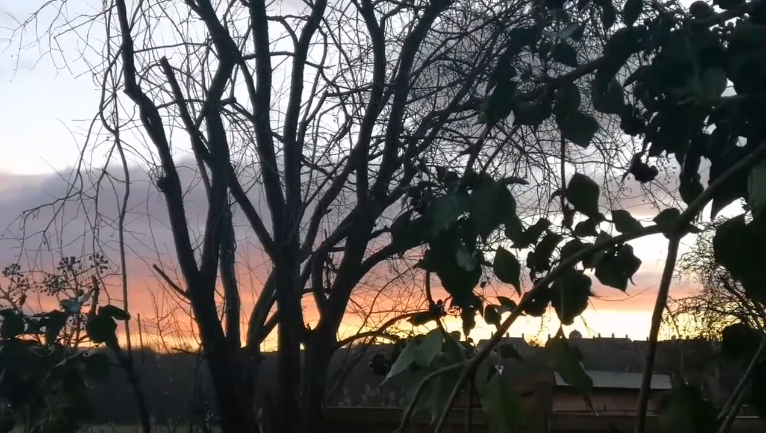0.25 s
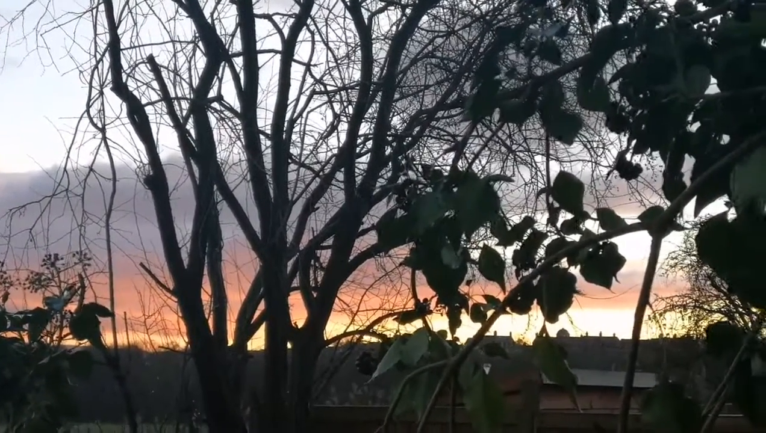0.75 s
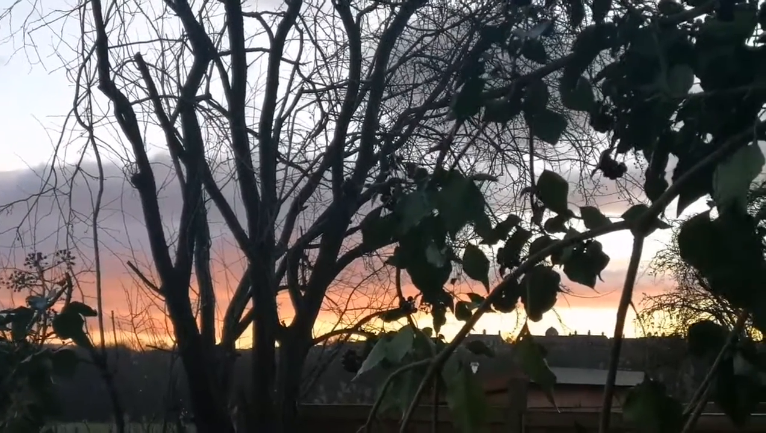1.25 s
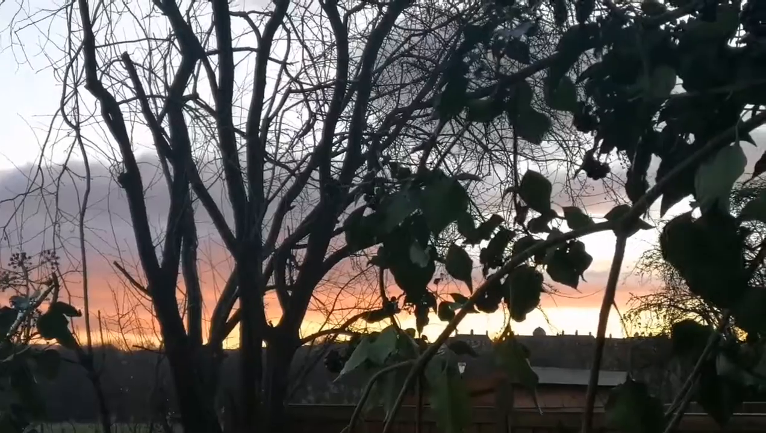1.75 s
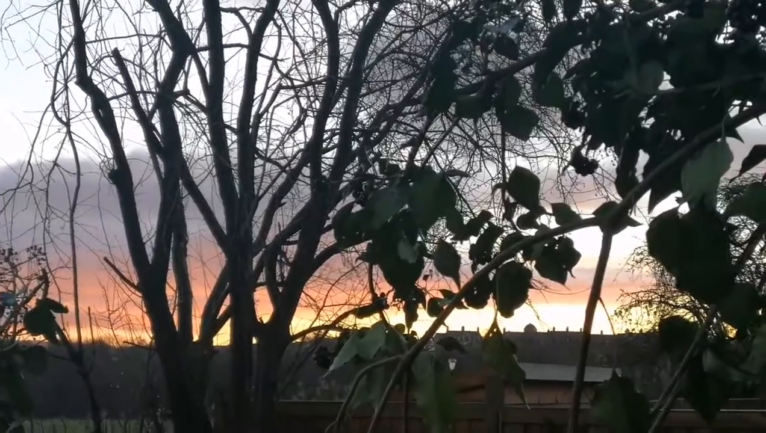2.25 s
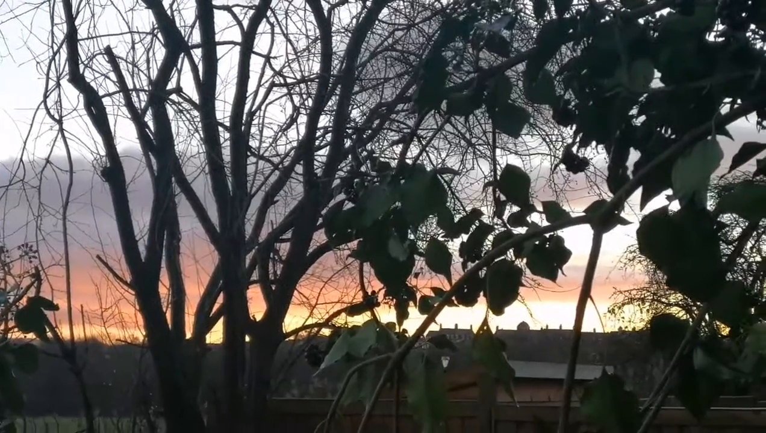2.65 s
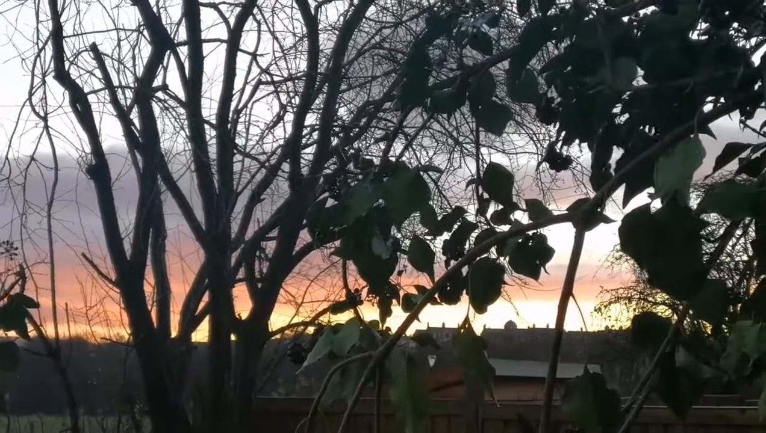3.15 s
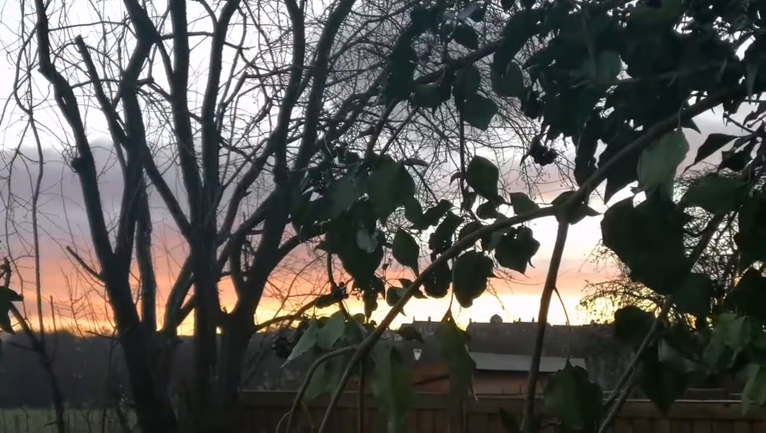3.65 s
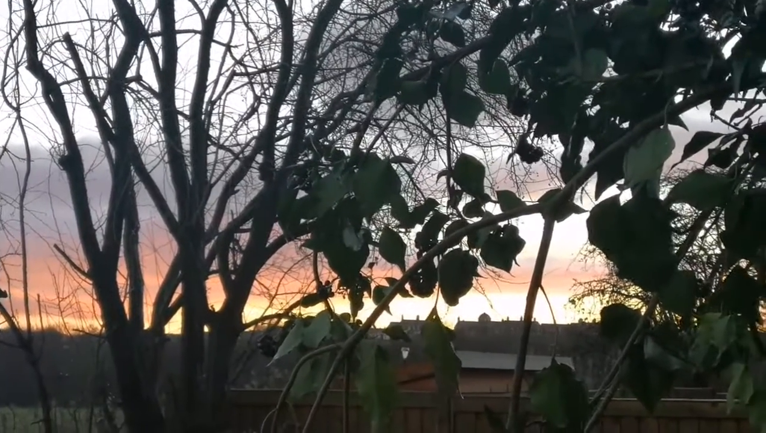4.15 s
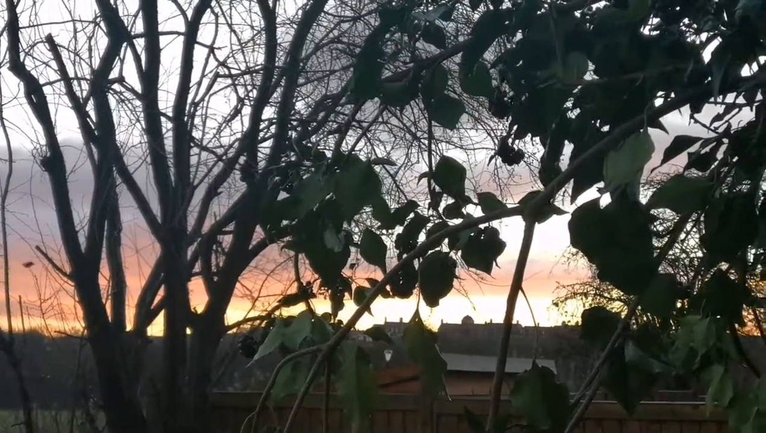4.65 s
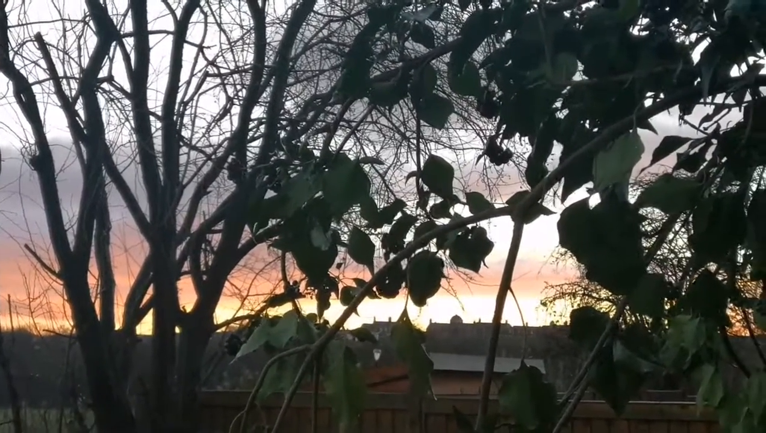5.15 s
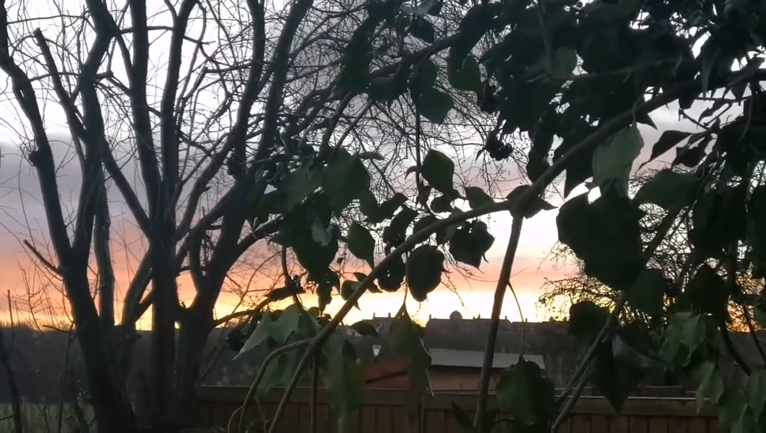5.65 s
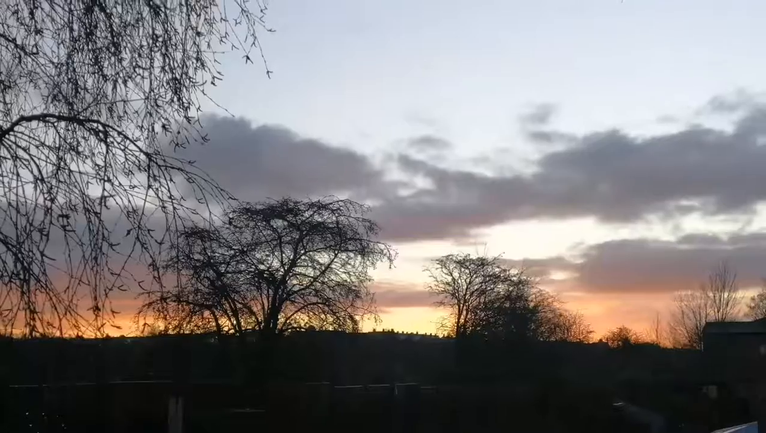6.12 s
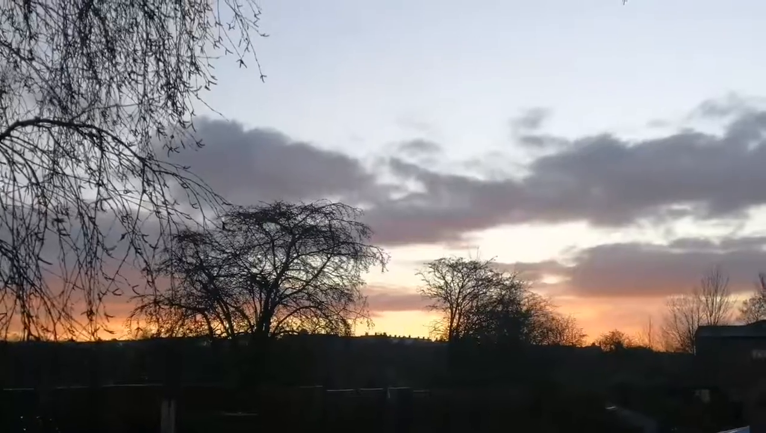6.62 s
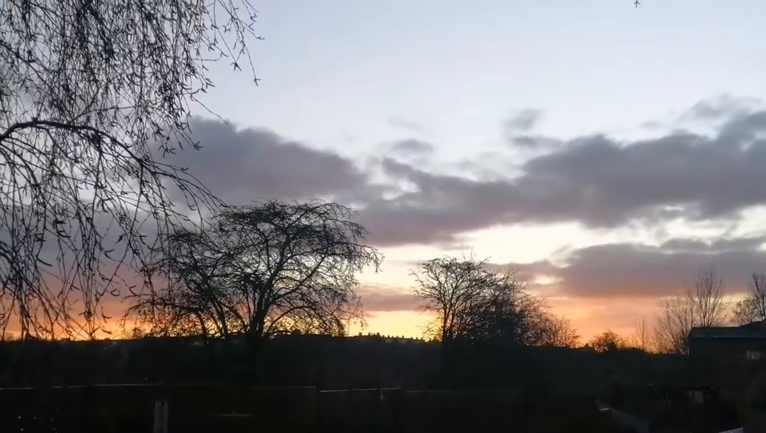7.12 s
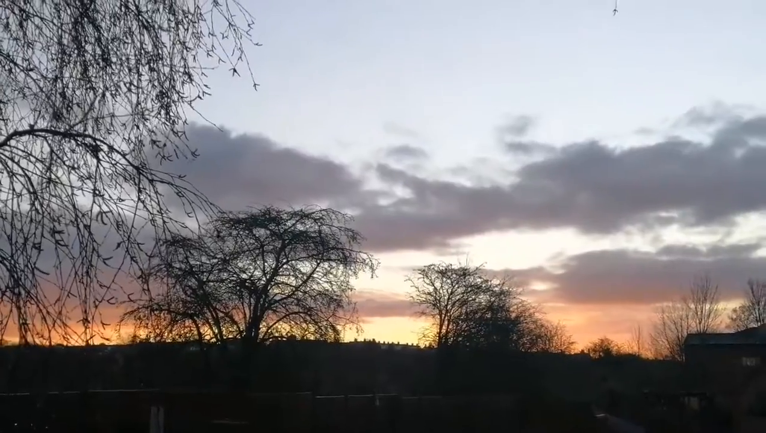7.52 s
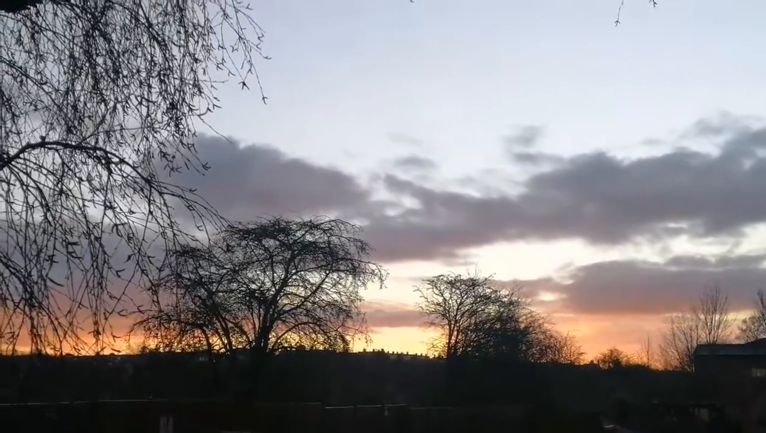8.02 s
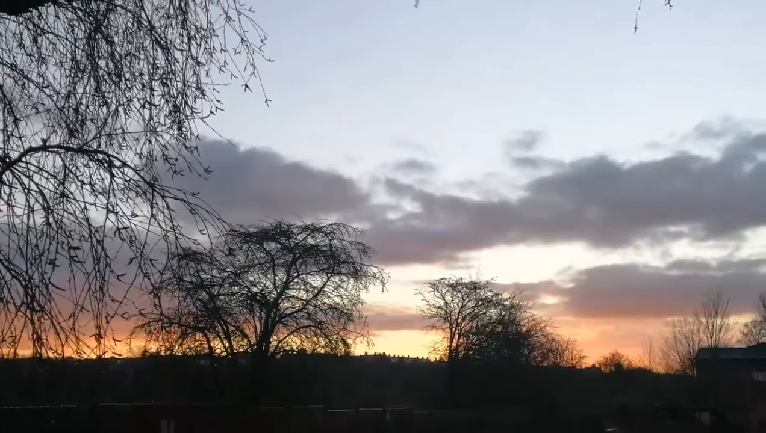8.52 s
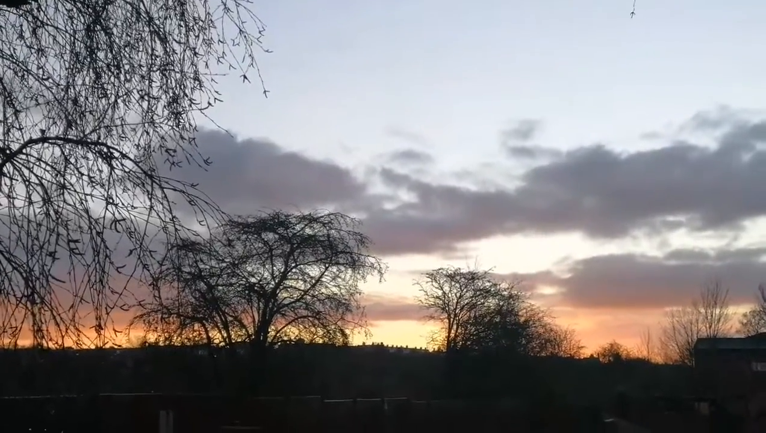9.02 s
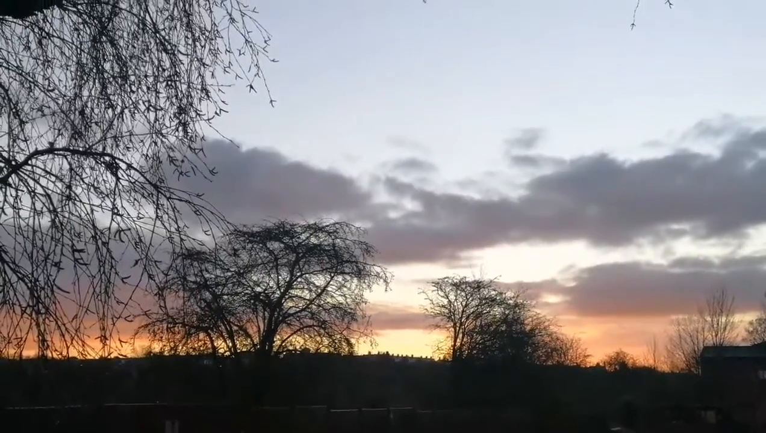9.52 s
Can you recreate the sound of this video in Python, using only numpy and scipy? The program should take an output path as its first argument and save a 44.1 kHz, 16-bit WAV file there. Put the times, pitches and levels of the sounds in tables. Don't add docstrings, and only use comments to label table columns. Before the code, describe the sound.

Handheld stereo outdoors among bare trees: faint far traffic, dull finger thumps and small clicks, birds mostly left. Bright whistles and fluttering warbles come in separate bursts with silence between. After almost six seconds there is a knock, a tiny gap, then a close grinding motor whirr with one strong low buzz at its start. Wind puffs and thuds join before it cuts off, then light brushing and a few distant bird notes finish.

```python
import sys
import numpy as np
from scipy import signal
from scipy.fft import rfft, irfft
from scipy.io import wavfile
from scipy.ndimage import uniform_filter1d

SR = 44100
rng = np.random.default_rng(int(sys.argv[2]) if len(sys.argv) > 2 else 0)


def invert_db(level):
    return 10 ** (np.asarray(level, dtype=float) / 20)


def to_wav(sig):
    pcm = np.clip(np.atleast_2d(sig), -1, 1) * 32767
    pcm = np.round(pcm).astype(np.int16)
    wavfile.write(sys.argv[1], SR, pcm.T)


N = 431298
T = np.arange(N) / SR
HZ = np.fft.rfftfreq(N, 1 / SR) + 1e-3

# f/Hz, density/dB per Hz, left minus right/dB, port likeness/0-1
AIR = [(60, -104, 0.5, .9), (150, -99, -0.5, 0.95), (288, -96.5, 1, 0.97), (650, -101, -6, 0.25),
       (920, -99, 0, 0.26), (1147, -94.5, -2, 0.5), (2010, -100, 5.5, 0.06), (2700, -104, 0.5, 0.06),
       (3570, -108, 6, 0), (5000, -110, -2, 0), (6500, -114, -0.5, 0.01), (8500, -112, -1.5, 0.02),
       (10500, -117, -0.5, 0), (15500, -120, 2, 0)]
# f/Hz, level/dB
SECOND_SPOT = [(60, -1.5), (200, 3), (450, 0), (700, -0.5), (1050, -1), (1600, -3.5), (2500, -2.5),
               (4000, -1)]
# f/Hz, level/dB
WIND_COLOUR = [(10, -19.5), (30, -5.5), (55, 0), (90, -6), (140, -14), (300, -19.5), (800, -61)]
# centre t/s, half length/s, level/dB
GUSTS = [
    (2.431, 0.34, -72),
    (5.298, 0.05, -57.5),
    (5.693, 0.26, -66),
    (7.102, 0.324, -70),
    (8.175, 0.11, -49.5),
    (8.6, 0.36, -62),
    (9.097, 0.15, -58),
    (9.695, 0.13, -58.5),
]
CALM_DB = -70.5
DROPOUT_S = (5.932, 5.952, 6.0)

# f/Hz, width/Hz, level/dB
RATTLE = [(744, 290, 0.5), (1300, 450, -7), (1680, 143, -3), (2070, 230, -1), (2580, 120, -5),
          (4000, 2500, -20), (8500, 1600, -18.5), (13500, 3900, -33)]
BUZZ_HZ, BUZZ_CREST_S = 231.3, 6.2662
BUZZ_START_S, DRIVE_S, BRAKE_S = 6.243, 0.022, 0.019
SWING, RING_SWING, RING_S = 0.2595, 0.018, 0.11

# f/Hz, level/dB, left minus right/dB, share repeating each turn/0-1
WHIR = [(100, -24, 1.5, 0.8), (216, -14.5, -1, 0.7), (326, -13, -2.5, 0.83), (516, -8, -5.5, 0.8),
        (693, -6, -8, 0.56), (1300, -9.5, -12, 0.62), (2460, -15, -17.5, 0.32), (5000, -20, -38, 0.1),
        (6500, -27.5, -38.5, 0.4), (8820, -21, -42, 0.12), (9830, -26, -44, .08), (11400, -44, -14, 0),
        (13000, -50.5, -27, 0)]
# share of turn/0-1, level/dB
MESH = [(0, -16), (.14, -13), (.22, -32), (.31, -3), (.38, -3), (.44, -20), (.52, -26), (.62, -12), (1, -2)]
# share of turn/0-1, half length/turn, f/Hz, level/dB
KNOCKS = [(.37, 0.054, 410, -0.5), (.85, .1, 302.6, -4), (.3, .08, 310, -10.5), (.908, 0.14, 546, -5.5),
          (.608, 0.044, 554, -7), (0.109, 0.052, 530, -11), (.388, 0.041, 536, -17.5), (.53, 0.11, 237, -9),
          (0.1984, 0.11, 353, -9), (.85, 0.084, 694, -17.5)]
# t/s, level/dB
HUM = [
    (6.05, 1),
    (6.2, 2),
    (6.45, 5),
    (6.8, 4.5),
    (6.95, 0.5),
]
MESH_TEETH = (40, 50)
TURN_S = 0.095835
TURN_START_S = 6.62 - 7 * TURN_S
MOTOR_S = (6.034, 8.6618)
LOAD_DB, SURGE_DB, SURGE_S = -45, 4, 0.21
MOTOR_LAG_S, MOTOR_TWIST_RAD, TWIST_HZ = 0.00057, 0.9, 170
PORT_LAG_S, PORT_LAG_HZ = 0.0009, 70

# t/s, level/dB, fade/s
RUSTLE = [
    (9.088, -58, 0.032),
    (9.248, -52, 0.043),
    (9.68, -67, .08),
]
# f/Hz, width/Hz, level/dB
RUSTLE_BANDS = [(1200, 1040, -1), (2600, 2100, -10), (5940, 3200, -13)]
# t/s, level/dB, left minus right/dB, width/ms
SNAPS = [
    (1.4695, -51, 0, .13),
    (1.342, -51, 3, .13),
    (3.0855, -51, 2, .1),
    (5.8667, -30, 14, 0.11),
    (6.2441, -26, -12, 0.14),
    (6.2479, -28, -10, .18),
    (8.6616, -29.5, -13.5, 0.1),
]
# t/s, level/dB, left minus right/dB, width/ms
POPS = [
    (5.8672, -34, 13, .25),
    (5.86765, -33, 14, .2),
    (5.869, -38, 14, .4),
    (5.868, -32, -11.5, .4),
    (9.0322, -43, -3, .15),
    (6.1134, -24.5, -7.5, 0.25),
    (9.65, -41, -6, 0.093),
]
REBOUND, REBOUND_WIDTHS, SNAP_LAG_S = 0.49, 3.94, 0.00058
# t/s, level/dB, left minus right/dB, ring f/Hz, treble share/dB
TICKS = [(.761, -42.5, 11, 3160, -40), (1.3413, -46, 4, 1870, -34), (1.469, -43.5, -0.5, 1300, -28),
         (2.425, -43, 0, 2400, -30), (3.0853, -45, 3, 1100, -33), (4.075, -49, 12.5, 1010, -22),
         (5.866, -41, 0, 2800, -11), (5.8667, -39, 11, 2100, -24), (6.113, -35, -10, 725, -28),
         (6.2445, -26.5, -4, 1100, -26), (8.6612, -51, -10, 1110, -37), (9.0318, -40, -3, 1200, -26),
         (9.0907, -38.5, -3.5, 1300, -19), (9.2544, -34, -4.5, 1410, -19), (9.268, -44.5, 10.5, 2200, 5.5),
         (9.649, -41, 0, 1040, -30)]
# t/s, level/dB, pitch f/Hz, snap share/dB
BUMPS = [(0.88, -48.5, 83.4, -25), (1.339, -51, 153, -6), (1.464, -53, 299, -6), (2.199, -58, 86.1, -20),
         (2.228, -50.5, 99.6, -23.5), (2.289, -48, 137, -11.5), (2.444, -33, 175, -18),
         (2.617, -46.5, 159, -20), (3.081, -48, 150, -16), (3.41, -46, 112, -16), (3.752, -51.5, 187, -18),
         (4.069, -48.5, 108, -8), (4.104, -41, 181, -14), (5.26, -35, 179, -20.5),
         (5.599, -44.5, 94.2, -15), (5.714, -50, 167, -15), (5.809, -49.5, 266, -18.5),
         (5.8612, -31, 66.4, -14), (6.042, -45.5, 51.3, -5), (7.999, -32.5, 109, -28),
         (8.089, -38.5, 61.9, -10.5), (8.18, -35, 48.4, -28), (8.229, -46, 67.3, -10),
         (8.363, -42.5, 45.8, -13), (9.0279, -31, 56, -11.5), (9.046, -43, 70, -16),
         (9.209, -50.5, 67.3, -22), (9.645, -32, 56.5, -27)]

# t/s, length/s, from f/Hz, to f/Hz, level/dB
CROW = [
    (7.1, 0.69, 351.6, 356, -74),
    (8.6, .27, 353, 345.5, -76.5),
]
# multiple of fundamental, level/dB
CROW_OVERTONES = [(3, 0), (4, -4), (5, -8), (7, -8), (8, -11), (10, -3)]
OPEN_SONG = [
    (7.2, 0.04, 4020, 4320, -59),
    (7.32, 0.045, 3585, 3465, -64),
    (7.35, 0.042, 3400, 3370, -58.5),
    (7.52, 0.034, 3470, 3340, -65),
    (8.996, 0.018, 4100, 3450, -66.5),
    (9.011, 0.039, 3430, 4300, -64),
    (9.325, .014, 3980, 3960, -74),
    (9.1, .025, 5000, 4950, -74),
             (9.45, 0.124, 4420, 4330, -80),
    (9.49, 0.11, 4050, 4080, -79),
    (3.25, .03, 3080, 3100, -77),
    (2.95, .025, 3150, 3400, -76),
    (0.5, 3.3, 4500, 4870, -95),
]
HOOKED = [
    (9.058, .05, 4120, 4220, -58),
    (9.151, 0.041, 4450, 4500, -65),
    (9.238, 0.069, 4040, 3970, -63.5),
]
SLIDE = [
    (9.356, 0.14, 3440, 4170, -71.5),
]
SEEP = [
    (3.76, 0.06, 7850, 8400, -73),
    (3.805, 0.065, 8500, 8600, -63),
    (3.88, .08, 8680, 8100, -76),
    (3.96, .055, 7980, 8020, -70),
    (4.015, 0.066, 8200, 8440, -72),
    (4.07, .04, 8700, 8850, -73),
    (4.105, 0.039, 8520, 8440, -69.5),
]
TWO_TONE = [
    (.42, 0.135, 5050, 4800, -75),
    (1.555, .05, 5000, 5000, -78),
    (1.6, .07, 5070, 5000, -72),
    (1.66, .12, 5000, 4550, -79),
    (2.975, .12, 5120, 5050, -78),
    (3.78, 0.19, 4880, 4640, -69.5),
    (4.93, 0.13, 5100, 4900, -74.5),
    (9.67, 0.12, 5300, 5250, -75),
]
UPPER_TONE = [
    (.42, .135, 5800, 5800, -76),
    (1.545, .11, 5680, 5880, -74),
    (2.975, .12, 5800, 5800, -78),
    (3.77, .06, 5780, 5880, -76),
    (3.81, .1, 5940, 5950, -68),
    (3.915, .055, 5930, 5920, -72),
    (4.93, .13, 5800, 5800, -74.5),
]
WHISTLE = [
    (4.277, 0.029, 3320, 3400, -59.5),
    (4.306, 0.0596, 3500, 3705, -45),
]
SWEET = [
    (1.05, 0.034, 3335, 3424, -51.5),
    (1.078, 0.022, 3470, 3600, -53.5),
]
LONG_WHISTLE = [
    (3.38, 0.137, 3680, 3560, -79.5),
    (3.5, 0.177, 3640, 3670, -76.5),
    (3.46, 0.22, 3440, 3440, -80),
]
GRUNT = [
    (4.408, 0.092, 2860, 2654, -58.5),
    (5.114, .035, 2400, 2310, -70),
    (5.35, .04, 2580, 2700, -75),
]
HELD = [
    (4.795, 0.18, 3450, 3630, -68.5),
    (4.37, 0.037, 3540, 3620, -59),
]
HIGH_VOICE = [(4.252, 0.022, 4050, 4080, -70.5), (4.58, 0.048, 4420, 4450, -77),
              (4.7, 0.03, 4250, 4203, -73), (4.742, .02, 4200, 4220, -70), (4.765, .035, 4200, 4250, -74),
              (5.128, .014, 4100, 4280, -68), (5.14, 0.024, 4220, 4020, -63),
              (5.19, 0.022, 4290, 4220, -62), (5.11, .05, 3470, 3380, -67), (5.275, 0.045, 3830, 3870, -71),
              (5.18, .035, 4600, 4550, -74), (5.335, .07, 4580, 4320, -78)]
WARBLE = [(1.043, 0.012, 3220, 3300, -57), (1.1, 0.018, 3430, 3390, -54), (1.114, .012, 3500, 3600, -60),
          (1.128, 0.016, 3450, 3420, -57), (1.142, 0.021, 3500, 3600, -60), (1.15, .022, 3740, 3840, -63),
          (1.166, .02, 3680, 3760, -59), (1.184, .024, 3780, 3900, -62), (1.21, .028, 3760, 3880, -62),
          (1.245, 0.036, 3830, 3960, -63.5), (1.314, 0.02, 3520, 3250, -61),
          (1.332, 0.029, 3250, 3570, -57.5), (1.36, 0.038, 3338, 3520, -63.5),
          (1.396, .014, 3450, 3600, -62), (4.642, 0.029, 3750, 3850, -68), (4.69, 0.02, 3200, 3420, -59),
          (5.209, 0.014, 3400, 3950, -51), (5.222, 0.02, 3950, 3850, -64), (5.235, .03, 3500, 3650, -65),
          (5.094, .02, 3150, 3510, -64), (5.325, 0.021, 3463, 4000, -56), (5.343, 0.015, 3950, 3540, -55),
          (5.35, 0.016, 3520, 3890, -54), (5.37, 0.019, 4020, 3870, -49.5),
          (5.388, .028, 4014, 3860, -54.5), (5.445, .02, 3800, 4040, -65), (5.46, 0.042, 4000, 4030, -66.5)]
LOW_VOICE = [(1.305, 0.11, 3000, 3100, -68), (1.34, .1, 3300, 3400, -70), (4.41, .11, 3250, 3000, -68),
             (4.53, .07, 2900, 2750, -71), (5.05, .04, 3150, 3000, -72), (4.493, 0.075, 3300, 3120, -58),
             (4.5, .07, 2550, 2400, -73), (5.31, 0.045, 3050, 2950, -67), (4.575, 0.092, 3200, 3100, -65),
             (4.81, 0.23, 3363, 3300, -72.5), (4.722, .08, 3350, 3420, -59), (4.685, .045, 3150, 3100, -66),
             (4.7, .06, 3750, 3400, -70), (4.97, .11, 3430, 3040, -72), (5.105, 0.06, 3120, 2960, -64),
             (5.15, 0.071, 3060, 3250, -58.5), (5.22, 0.11, 3180, 3210, -64)]
PLUNGE = [
    (1.024, 0.025, 2980, 3620, -63.5),
    (1.296, .024, 2980, 3520, -62),
    (4.666, .028, 4400, 3100, -58),
    (4.677, .025, 4350, 3850, -65),
    (4.7, .022, 3050, 2650, -68),
    (5.434, .018, 3380, 3900, -64),
    (4.383, 0.029, 3950, 2950, -63),
    (4.243, .012, 3750, 4400, -67),
]
# t/s, length/s, level/dB
RASP = [
    (2.26, 0.58, -65),
    (6.93, 0.32, -62.5),
    (1.44, 0.2, -79),
]
# f/Hz, width/Hz, level/dB
RASP_THROAT = [(2230, 980, -4.5), (3400, 680, -11.5), (4050, 620, -3)]
RASP_RISE_SHARE, RASP_FADE_DB = 0.16, -20
RASP_THROB_DB, RASP_THROB_HZ = 2.5, 120

# attack/s, release/s, swell over the note/dB, bend (under 1 reaches its goal early)
SCOOP = (0.005, 0.012, -3, 0.3)
MUTTER = (0.03, 0.07, -6, 0.5)
SWELL = (0.0096, 0.0029, 4.5, 0.483)
DRAWL = (0.025, 0.04, -2, 0.9)
PIPE = (0.007, 0.014, -5, 0.85)
DIVE = (0.006, 0.012, -1, 0.2)
CALL = (0.03, 0.06, -4, 1.2)
HOLD = (0.01, 0.03, -5, 0.05)
FADE = (0.006, 0.03, -12, 3.0)
FAINT = (0.02, 0.03, -2, 0.65)
STRAIGHT = (0.007, 0.008, 0, 3.0)
TRILL_HZ, ARCH_HZ = 44, 150
HOOK_HZ, HOOK_S = 350, 0.004
BLUR_DB, BLUR_HZ = -18, 500
LEAF_SWAY, LEAF_SWAY_HZ = 0.35, 400


def unit(x):
    return x / np.sqrt(np.mean(x ** 2))


def over_hz(table):
    hz, *columns = np.transpose(table)
    return [np.interp(np.log(HZ), np.log(hz), c) for c in columns]


def resonate(x, modes):
    gain = sum(invert_db(db) / (1 + (2 * (HZ - hz) / width) ** 4) for hz, width, db in modes)
    return irfft(rfft(x) * gain, N)


def walk(rate_hz):
    k = int(SR / rate_hz)
    return unit(uniform_filter1d(uniform_filter1d(rng.standard_normal(N), k), k))


def split_db(pan_db):
    return np.array([[pan_db], [-pan_db]]) / 2


def ports(x, pan_db, lag_s=PORT_LAG_S, twist_rad=0):
    delay_s = lag_s * HZ ** 2 / (HZ ** 2 + PORT_LAG_HZ ** 2)
    twist = twist_rad / (1 + (TWIST_HZ / HZ) ** 4)
    late = np.exp(-2j * np.pi * HZ * delay_s - 1j * twist)
    return np.array([irfft(rfft(x) * late * invert_db(pan_db), N), x])


def echo(x, t60_s, wet_db):
    t = T[:SR // 2]
    gather = np.clip((t - 0.008) / 0.0085, 0, 1)
    tail = rng.standard_normal((2, len(t))) * invert_db(-60 * t / t60_s) * gather
    stir = (1 + LEAF_SWAY * walk(LEAF_SWAY_HZ)) / np.hypot(1, LEAF_SWAY)
    return x + invert_db(wet_db) * stir * signal.fftconvolve(x[:1], tail, axes=1)[:, :N]


def traffic():
    db, pan_db, like = over_hz(AIR)
    like = np.clip(like, 0, 1)
    shared = ports(rng.standard_normal(N) * invert_db(1.3 * walk(1.7)), 0, lag_s=0.00075)
    own = rng.standard_normal((2, N))
    mix = np.sqrt(like) * rfft(shared) + np.sqrt(1 - like) * rfft(own)
    level = invert_db(db + np.array([pan_db, -pan_db]) / 2) * np.sqrt(SR / 2)
    town = irfft(mix * level, N)
    second = irfft(rfft(town) * invert_db(over_hz(SECOND_SPOT)[0]), N)
    return np.where(T < DROPOUT_S[2], town, second)


def wind():
    rumble = unit(irfft(rfft(rng.standard_normal(N)) * invert_db(over_hz(WIND_COLOUR)[0]), N))
    gusts = sum(invert_db(db) * np.exp(-((T - s) / half) ** 2) for s, half, db in GUSTS)
    return ports(rumble * (invert_db(CALM_DB) + gusts) * invert_db(2 * walk(8.3)), 0, lag_s=0.00052)


def buzz():
    t = T - BUZZ_START_S
    run_s = DRIVE_S + BRAKE_S
    driven = SWING * np.clip(np.minimum(t / DRIVE_S, (run_s - t) / BRAKE_S), 0, 1)
    ring = RING_SWING * np.exp(-np.abs(t - run_s) / RING_S) * (t > DRIVE_S)
    phase = 2 * np.pi * BUZZ_HZ * (T - BUZZ_CREST_S)
    mass = np.maximum(driven, ring) * np.cos(phase)
    chatter = (0.3 + np.cos(phase) ** 2) * (driven > 0) * invert_db(-34.0)
    rattle = unit(resonate(rng.standard_normal(N), RATTLE)) * chatter
    return ports(mass, 1.1, lag_s=0.001) + ports(rattle, -7.5)


def gear_hum(turn, mesh_db):
    wheel = invert_db(mesh_db) * np.cos(2 * np.pi * MESH_TEETH[0] * (turn - 0.37))
    pinion = invert_db(-14) * np.cos(2 * np.pi * MESH_TEETH[1] * (turn - 0.968))
    for share, half, hz, knock_db in KNOCKS:
        off = (turn - share + 0.5) % 1 - 0.5
        pinion = pinion + invert_db(knock_db) * np.exp(-(off / half) ** 2) * np.cos(2 * np.pi * hz * off * TURN_S)
    return unit(wheel + pinion)


def motor():
    turn = (T - TURN_START_S) / TURN_S % 1
    mesh_db = np.interp(turn, *np.transpose(MESH))
    db, pan_db, repeat = over_hz(WHIR)
    repeat = np.clip(repeat, 0, 1)
    one_turn = rng.standard_normal(int(TURN_S * SR) + 1)
    worn = one_turn[(turn * TURN_S * SR).astype(int)]
    grind = np.sqrt(repeat) * rfft(worn) + np.sqrt(1 - repeat) * rfft(rng.standard_normal(N))
    grind = unit(invert_db(0.067 * mesh_db) * irfft(invert_db(db) * grind, N))
    hum_db = -1 + np.interp(T, *np.transpose(HUM))
    whir = grind + invert_db(hum_db) * gear_hum(turn, mesh_db)
    start, stop = MOTOR_S
    load_db = LOAD_DB + SURGE_DB * np.exp(-((T - start) / SURGE_S) ** 2)
    load = invert_db(load_db) * (T > start) * (T < stop)
    return load * ports(whir, pan_db, lag_s=MOTOR_LAG_S, twist_rad=MOTOR_TWIST_RAD)


def rustle():
    level = 0
    for s, db, fade_s in RUSTLE:
        t = T - s - 0.01
        level = level + invert_db(db) * np.exp(-np.abs(t) / np.where(t < 0, 0.004, fade_s))
    grains = rng.standard_normal((2, N)) * invert_db(3.4 * walk(300))
    return level * unit(resonate(grains, RUSTLE_BANDS))


def snaps():
    out = np.zeros((2, N))
    for sign, table in ((-0.91, SNAPS), (0.96, POPS)):
        for s, db, pan_db, width_ms in table:
            on = slice(int((s - 0.003) * SR), int((s + 0.006) * SR))
            late_s = SNAP_LAG_S * np.array([[pan_db < 0], [pan_db > 0]])
            u = (T[on] - s - late_s) * 1000 / width_ms
            spike = np.exp(-u ** 2)
            rebound = REBOUND * np.exp(-((u - REBOUND_WIDTHS) / 1.1) ** 2)
            second = 0.18 * np.exp(-((u - 2 * REBOUND_WIDTHS) / 2) ** 2)
            out[:, on] += sign * invert_db(db + split_db(pan_db)) * (spike - rebound + second)
    return out


def ticks():
    out, t = np.zeros((2, N + SR)), T[:SR // 8]
    treble = signal.butter(3, [5000, 8200], "band", fs=SR, output="sos")
    for s, db, pan_db, hz, treble_db in TICKS:
        hiss = rng.standard_normal(len(t))
        ring = np.sin(2 * np.pi * hz * t) * np.exp(-hz * t / 1.24)
        crack = np.sin(2 * np.pi * 1.8 * hz * t) * np.exp(-t / 0.001) * min(1, (1800 / hz) ** 4)
        onset = 1 - np.exp(-(hz * t / 0.59) ** 2)
        band = signal.butter(2, [0.45 * hz, 1.2 * hz], "band", fs=SR, output="sos")
        scuff = signal.sosfilt(band, hiss) * np.exp(-t / 0.013)
        edge = signal.sosfilt(treble, hiss) * np.exp(-t / 0.0019)
        tick = (1.12 * ring + 0.33 * crack) * onset + 0.26 * scuff + invert_db(treble_db - 2.5) * edge
        out[:, int(s * SR):][:, :len(t)] += invert_db(db + split_db(pan_db)) * tick
    return out[:, :N]


def bumps():
    out, t = np.zeros(N + SR), T[:SR // 8]
    after = t - 0.005
    for s, db, hz, snap_db in BUMPS:
        turns = hz * np.maximum(after, 0)
        rise = np.exp(-(np.minimum(after, 0) / 0.00097) ** 2)
        decay = np.exp(-turns / (0.68 + hz / 350))
        swing = rise * np.cos(2 * np.pi * 1.11 * turns ** 0.65) * decay
        snap = np.exp(-(after / 0.0005) ** 2)
        out[int(s * SR):][:len(t)] += invert_db(db) * (1.17 * swing + invert_db(snap_db + 8.5) * snap)
    return ports(out[:N], 0.97)


def sing(notes, shape, shake_db, wobble, trill=0., flutter_hz=90, ratio=1, hook_hz=0, arch_hz=0):
    out, shake, throw = np.zeros(N), np.minimum(walk(flutter_hz), 1), walk(flutter_hz)
    attack_s, release_s, swell_db, bend = shape
    for s, length, from_hz, to_hz, db in notes:
        on = slice(int(s * SR), int((s + length) * SR))
        t = np.maximum(T[on] - s, 0)
        edge = np.clip(np.minimum(t / attack_s, (length - t) / release_s), 0, 1)
        glide = from_hz + (to_hz - from_hz) * np.tanh(t / length / bend) / np.tanh(1 / bend)
        glide = glide + hook_hz * np.exp(-t / HOOK_S) + arch_hz * np.sin(np.pi * t / length)
        flick = signal.sawtooth(2 * np.pi * TRILL_HZ * t, 0.75)
        pitch_hz = ratio * glide * (1 + wobble * throw[on] + trill * flick)
        level = invert_db(db + swell_db * (t / length - 0.5) + shake_db * shake[on])
        out[on] += edge * level * np.sqrt(2) * np.sin(2 * np.pi * np.cumsum(pitch_hz) / SR)
    return out


def crow():
    return sum(invert_db(db) * sing(CROW, CALL, 3.6, 0.004, flutter_hz=40, ratio=k) for k, db in CROW_OVERTONES)


def field_birds():
    song = invert_db(0.5) * sing(OPEN_SONG, PIPE, 1.5, 0.0079)
    song = song + sing(HOOKED, PIPE, 2.6, 0.005, hook_hz=HOOK_HZ)
    song = song + sing(SLIDE, FADE, 1.8, 0.0075)
    seep = invert_db(2.5) * sing(SEEP, PIPE, 2.8, 0.0089, flutter_hz=200)
    return echo(ports(song + crow() + seep, 5.2, lag_s=-0.000052), 0.3, -44)


def thin_callers():
    lower = sing(TWO_TONE, FAINT, 4.0, 0.007, arch_hz=ARCH_HZ)
    upper = sing(UPPER_TONE, FAINT, 3, 0.003)
    return invert_db(-6.0) * lower + invert_db(-10) * upper


def rasp():
    level = 0
    for s, length, db in RASP:
        share = np.clip((T - s) / length, 0, 1)
        rise = np.minimum(share / RASP_RISE_SHARE, 1)
        fade = np.maximum(share - RASP_RISE_SHARE, 0)
        level = level + rise * invert_db(db + RASP_FADE_DB * fade ** 1.67) * (share < 1)
    breath = unit(resonate(rng.standard_normal(N), RASP_THROAT))
    return uniform_filter1d(level, size=600) * invert_db(RASP_THROB_DB * walk(RASP_THROB_HZ)) * breath


def whistlers():
    clear = sing(WHISTLE, SWELL, 1, 0.002) + sing(SWEET, PIPE, 1, 0.002)
    clear = clear + sing(LONG_WHISTLE, DRAWL, 1.5, 0.003)
    clear = clear + sing(GRUNT, DIVE, 2.5, 0.008, flutter_hz=350)
    clear = clear + sing(HELD, HOLD, 3, 0.006, flutter_hz=200)
    return clear + invert_db(-1) * sing(HIGH_VOICE, SCOOP, 4, 0.015, flutter_hz=200)


def warblers():
    rough = sing(WARBLE, SCOOP, 2.5, 0.005, trill=0.006, flutter_hz=300)
    rough = rough + invert_db(-0.5) * sing(LOW_VOICE, MUTTER, 3.5, 0.017, trill=0.015, flutter_hz=400)
    rough = rough + sing(PLUNGE, STRAIGHT, 4, 0.014, flutter_hz=300)
    return rough * (1 + invert_db(BLUR_DB) * walk(BLUR_HZ))


def garden_birds():
    left = ports(warblers() + whistlers() + rasp(), 8.94, lag_s=-0.000061)
    right = ports(thin_callers(), -12, lag_s=-0.0002)
    return echo(invert_db(-2.5) * left + invert_db(4.5) * right, 0.43, -37)


def scene():
    background = traffic() + wind()
    case = buzz() + motor() + rustle() + snaps() + ticks() + bumps()
    return background + case + field_birds() + garden_birds()


def band_limit(x):
    return signal.sosfilt(signal.butter(12, 15740, fs=SR, output="sos"), x)


def record(dry):
    fade, silence, back = DROPOUT_S
    gate = np.where(T < back, np.clip((silence - T) / (silence - fade), 0, 1), 1)
    return band_limit(dry * gate)


dry = scene()
out = record(dry)
to_wav(out)
```